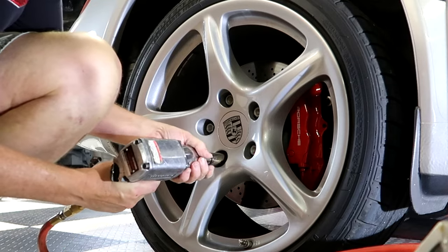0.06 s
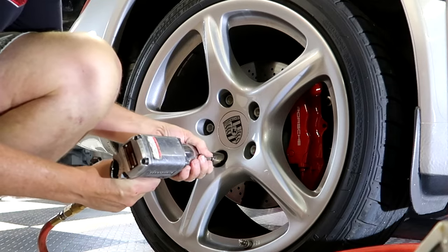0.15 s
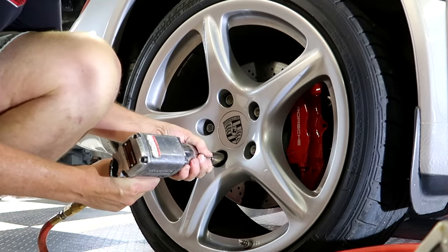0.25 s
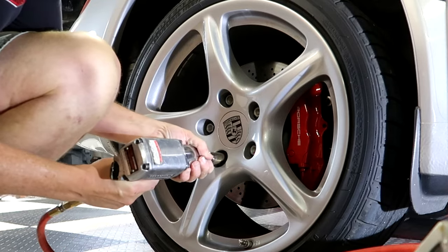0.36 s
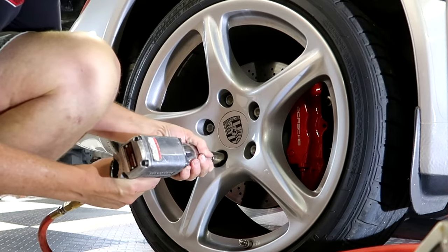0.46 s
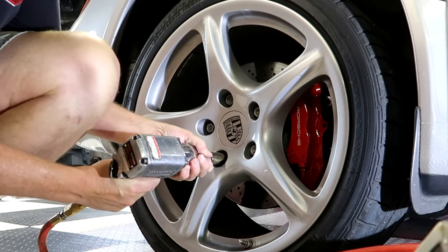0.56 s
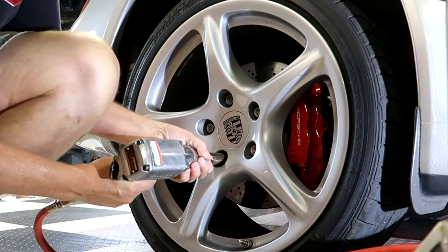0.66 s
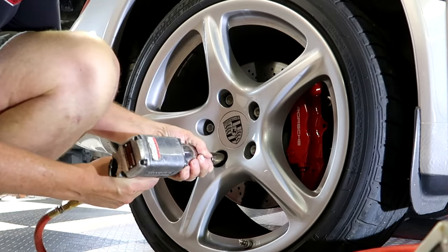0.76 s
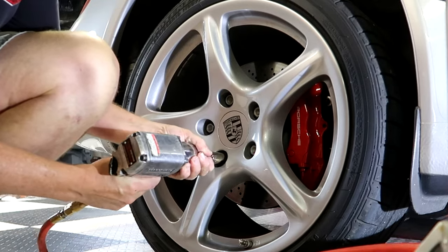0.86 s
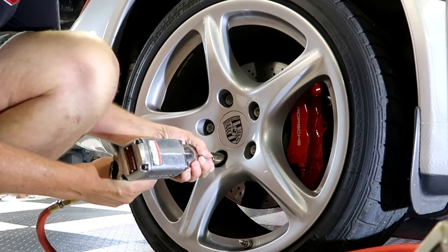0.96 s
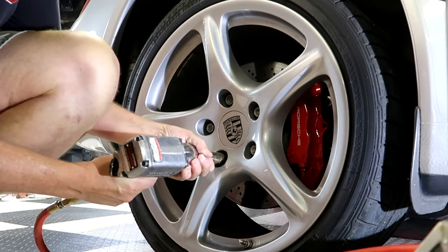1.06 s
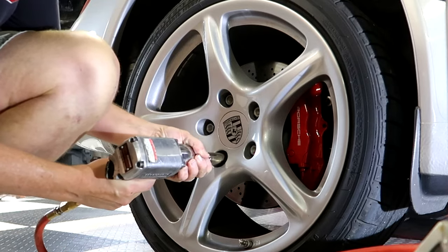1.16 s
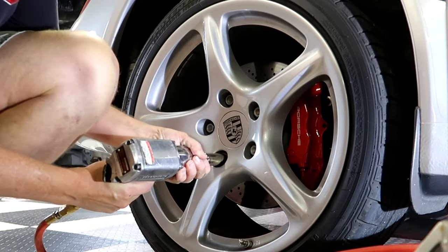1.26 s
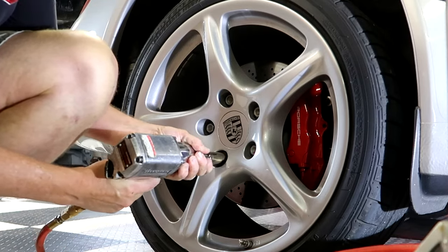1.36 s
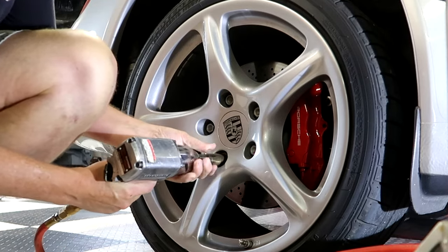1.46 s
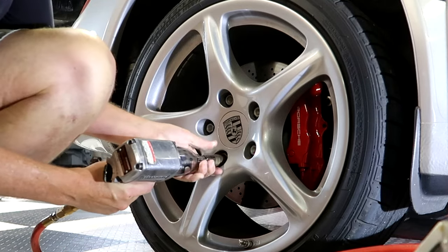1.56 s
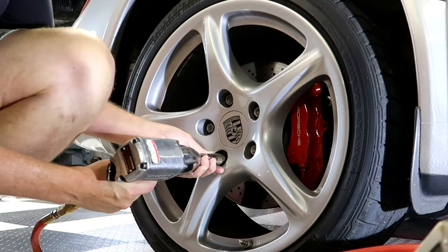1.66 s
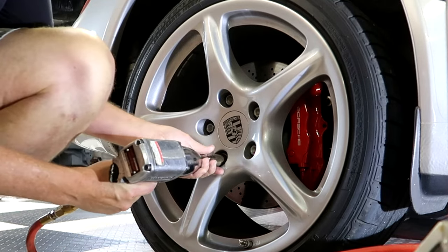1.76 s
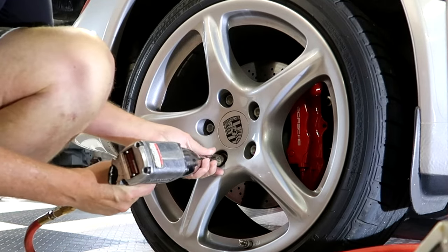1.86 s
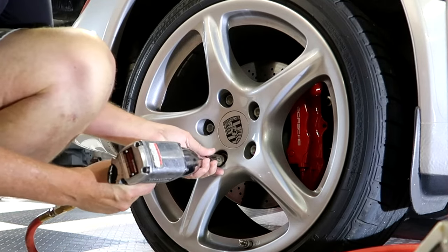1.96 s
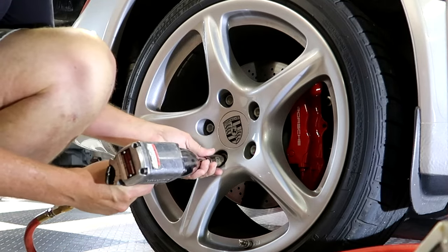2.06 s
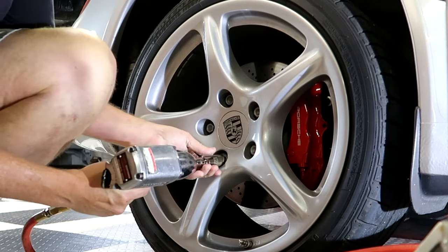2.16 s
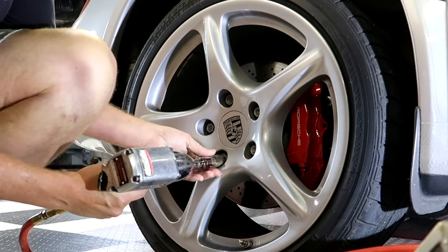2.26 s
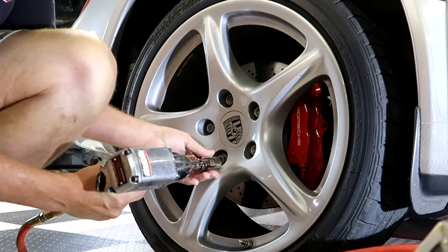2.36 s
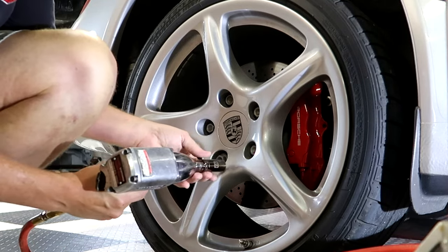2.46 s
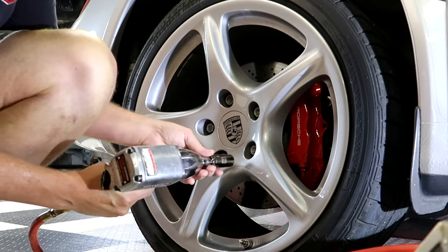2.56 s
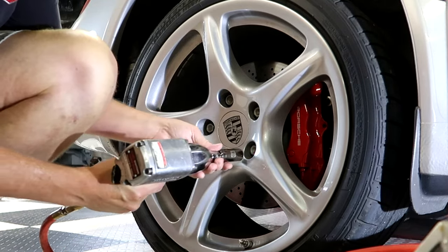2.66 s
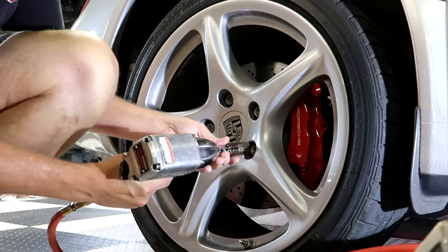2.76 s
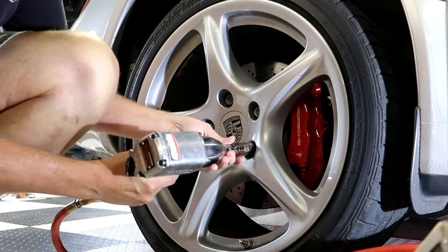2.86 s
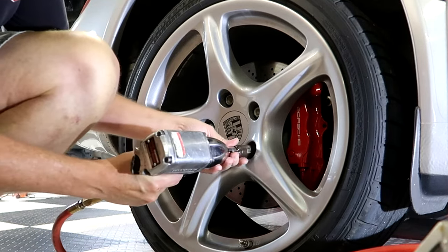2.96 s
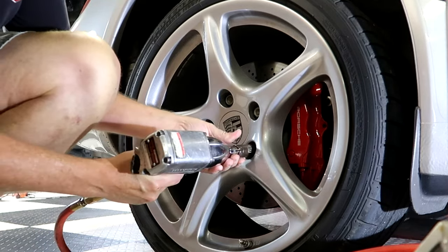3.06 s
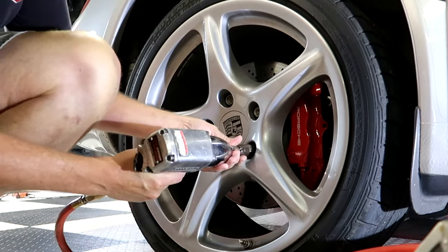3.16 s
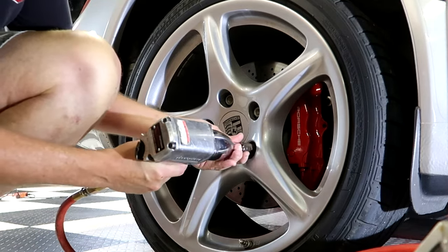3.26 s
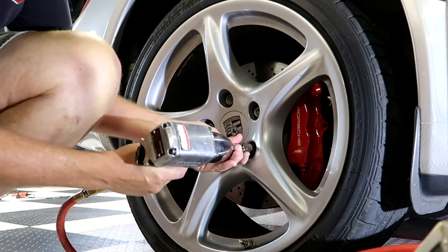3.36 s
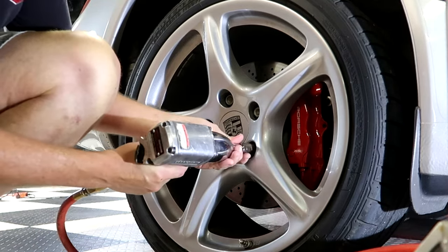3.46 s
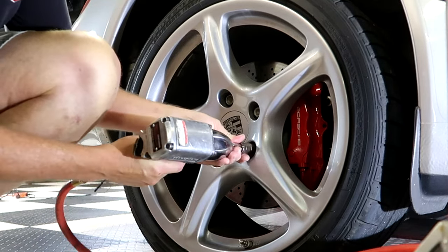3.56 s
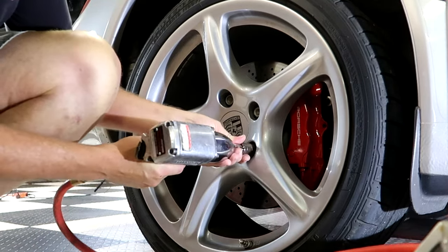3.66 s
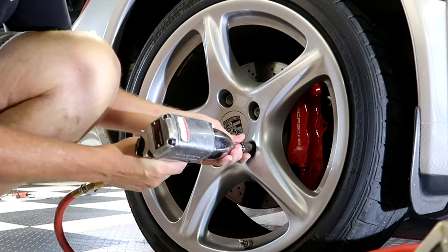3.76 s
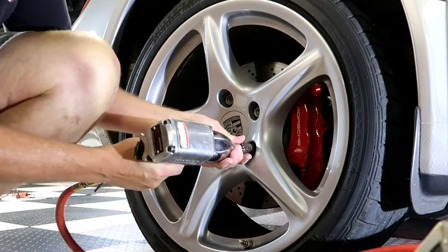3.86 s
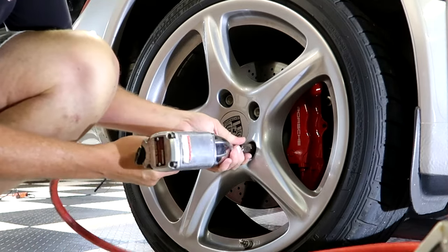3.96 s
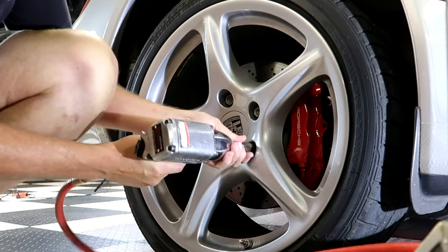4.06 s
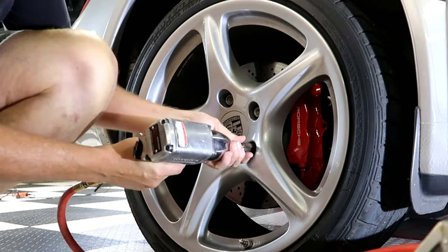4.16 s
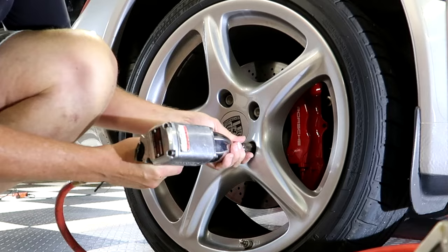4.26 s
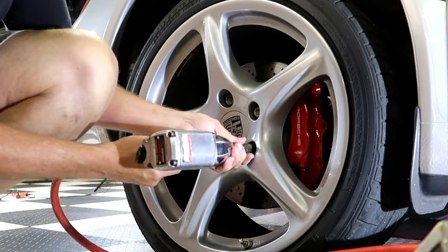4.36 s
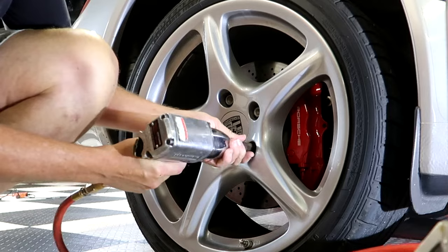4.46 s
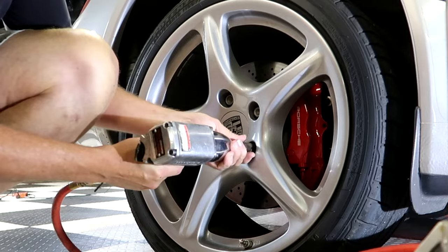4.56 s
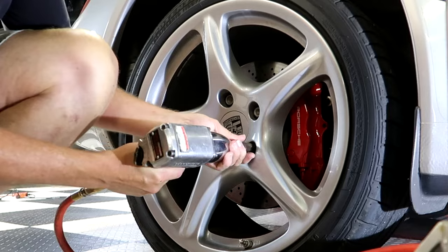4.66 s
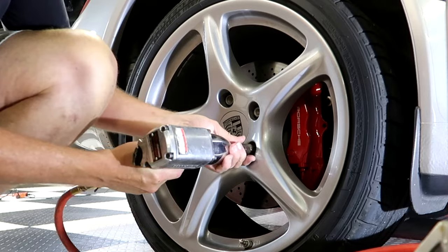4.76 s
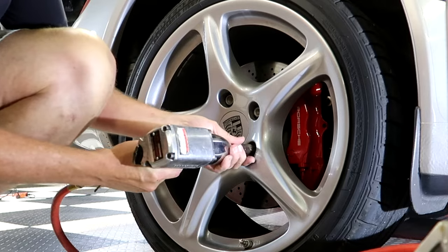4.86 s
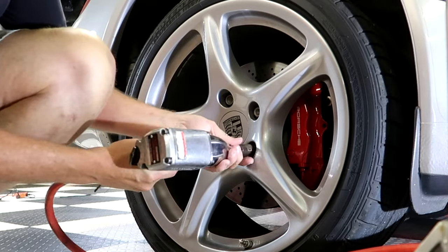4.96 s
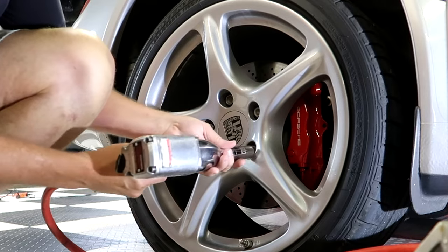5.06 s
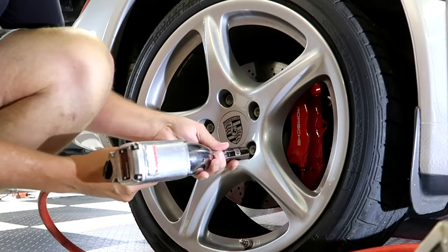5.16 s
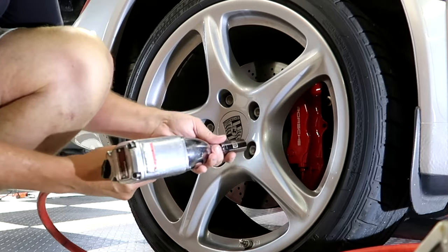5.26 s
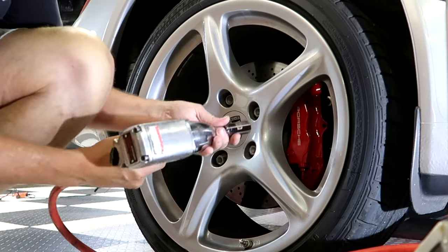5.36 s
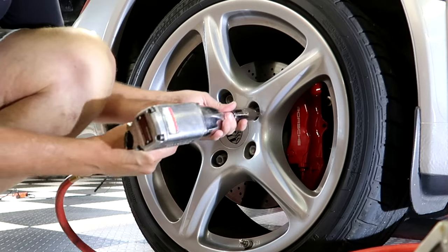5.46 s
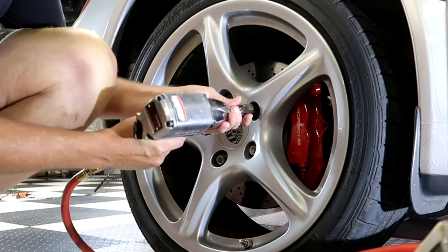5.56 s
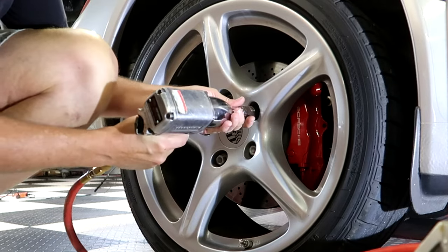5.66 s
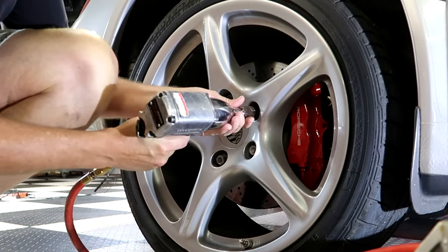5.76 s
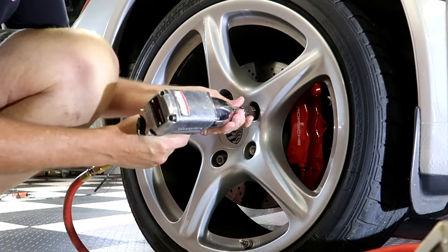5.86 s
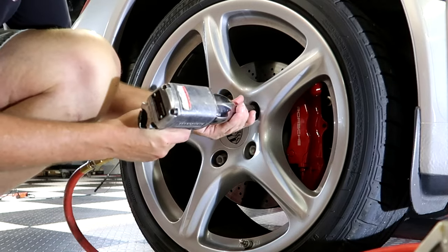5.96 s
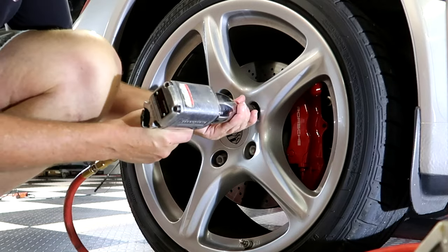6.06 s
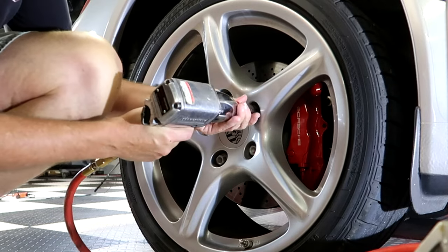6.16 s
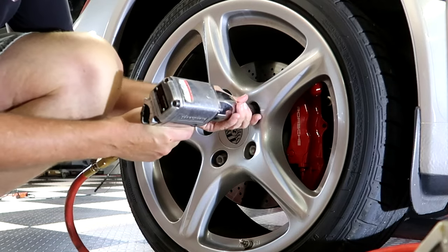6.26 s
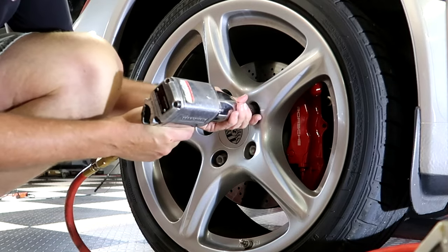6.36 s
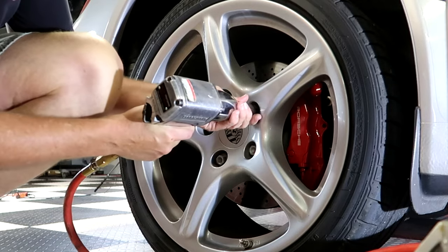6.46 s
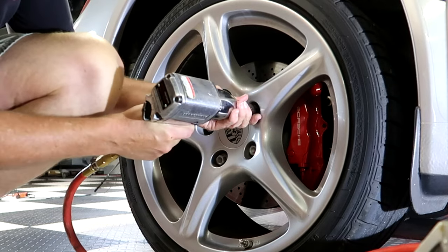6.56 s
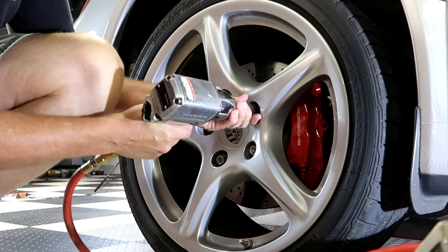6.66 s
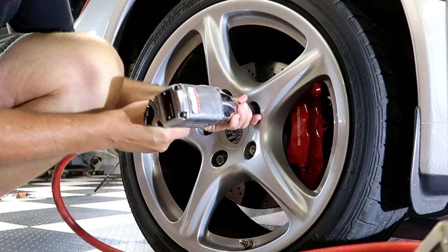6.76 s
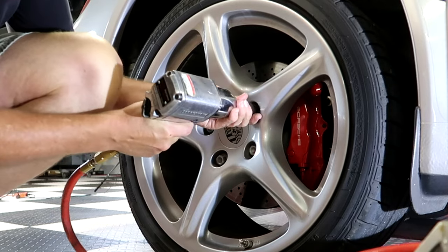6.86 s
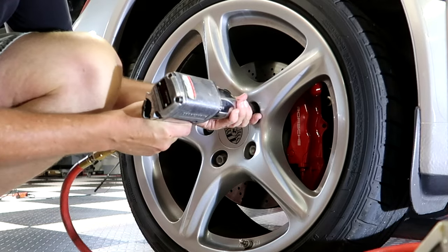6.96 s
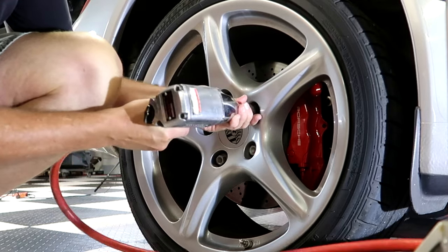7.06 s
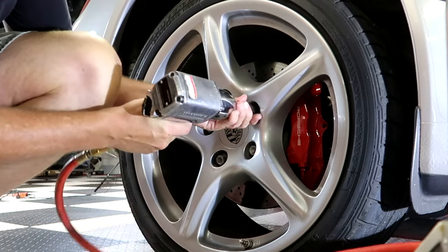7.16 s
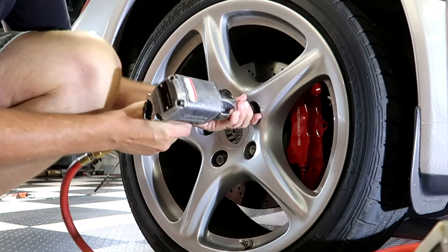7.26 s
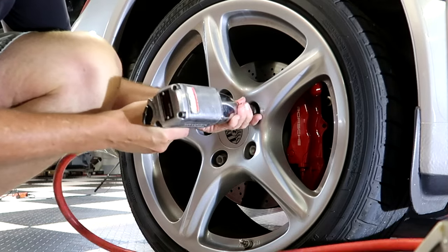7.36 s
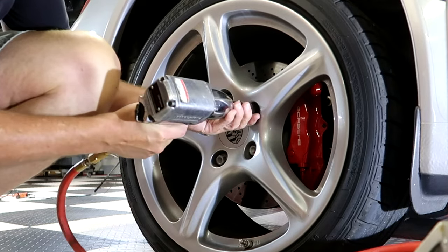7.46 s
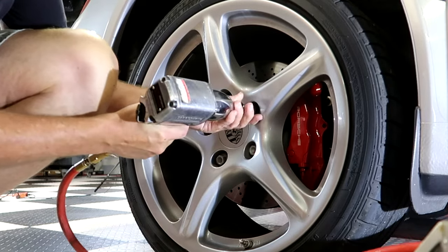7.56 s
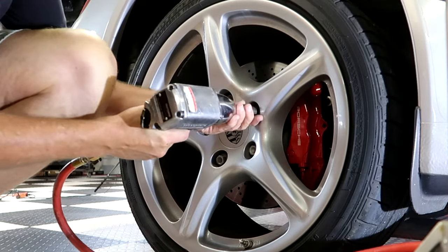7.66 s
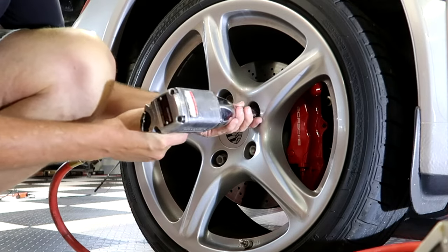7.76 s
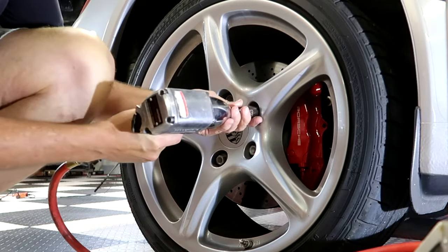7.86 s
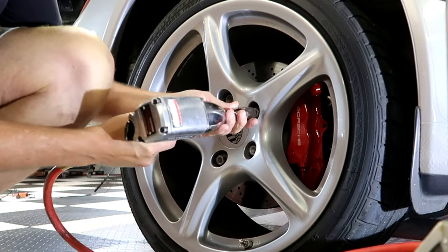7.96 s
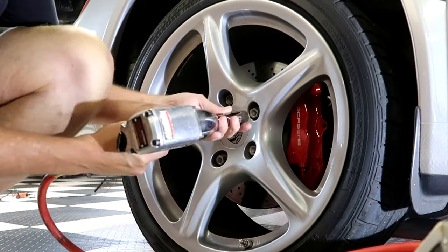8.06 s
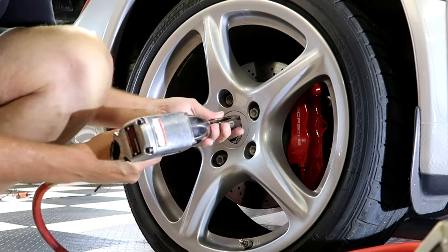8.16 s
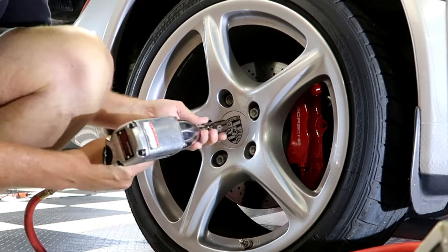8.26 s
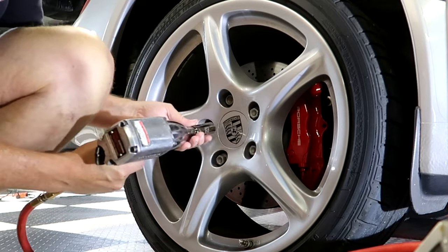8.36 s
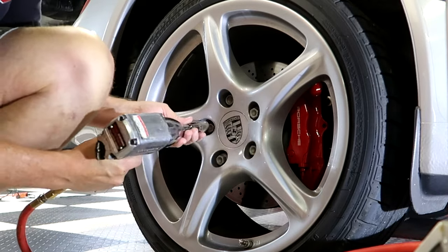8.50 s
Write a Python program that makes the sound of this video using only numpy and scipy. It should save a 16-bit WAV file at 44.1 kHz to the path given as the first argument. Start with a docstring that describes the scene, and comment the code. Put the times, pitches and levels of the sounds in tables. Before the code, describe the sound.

Close stereo pickup in a garage with a short, hard reverberation and a faint low machinery hum. At 0.25 s a soft air leak whirs, then an impact wrench bursts into loud, dense metallic hammering at 0.43-0.63 s, again at 0.8-0.95 and 1.1-1.4, with exhaust hiss and low thumps. The freed motor whines upward to about 1.45, then glides down by 2.0. Light socket clinks and dull wheel knocks dot 2.2-3.4. A knock and stronger valve hiss at 3.9 lead to bursts at 4.05-4.2 and 4.4-4.65, trailing into weak ticks until 4.9. Sparse clinks and knocks fill 5.2-6.5 as the hum creeps back. Valve air whirs at 6.7, then sharp bursts strike at 6.86, 7.15 and 7.45; an air pop hits at 7.57 as the motor briefly races, peaking near 7.6 and winding down by 8.0. A tiny clink and knock end it at 8.5.

```python
"""Impact wrench on wheel nuts

An air impact wrench loosens wheel nuts in a garage, close to two microphone ports.
On each trigger pull filtered noise hisses, low fading sines thump as exhaust, and noise bursts with ringing
modes strike as the hammer. A freed nut lets the vane motor race up and wind down as gliding tones.
Between nuts the socket clinks and knocks on the wheel over a low hum of noise and wavering tones.
"""
import sys
import numpy as np
from scipy import signal
from scipy.fft import rfft, irfft, next_fast_len
from scipy.io import wavfile
from scipy.ndimage import uniform_filter1d

SR = 44100
rng = np.random.default_rng(int(sys.argv[2]) if len(sys.argv) > 2 else 0)


def gain_from_db(level_db):
    """Convert decibel levels to linear amplitude factors (20 dB per decade)."""
    decades = np.asarray(level_db, float) / 20
    return 10 ** decades


def master(y):
    """Save y as 16-bit WAV."""
    cut = np.clip(np.atleast_2d(y).T, -1, 1)
    pcm = np.round(cut * 32767)  # scale
    wavfile.write(sys.argv[1], SR, pcm.astype(np.int16))


N = 376173
T = np.arange(N) / SR

# hammer on anvil, and the rattle as it runs down: (time [s], level [dB], clang pitch [Hz])
BLOWS = [(0.4431, -3.5, 1430), (0.4615, -5.5, 1845), (0.4815, -5, 1420), (0.5054, 0.5, 2160),
         (0.5298, -11.5, 1500), (0.5599, 1, 2110), (0.6317, -4, 2250), (0.74, -25.5, 1720),
         (0.8095, -6.5, 2260), (0.83, -9.5, 2240), (0.8465, -1, 2320), (0.8651, -13, 2820),
         (0.8882, -2.5, 3080), (0.9311, -3, 2820), (1.1225, -7.5, 2800), (1.1632, -2, 1960),
         (1.2027, -7.5, 2100), (1.2461, -12.5, 2880), (1.277, -7.5, 1360), (1.316, -5, 1430),
         (1.8423, -28, 1410), (4.0629, 5, 2090), (4.0837, -5.5, 2500), (4.1073, 0.5, 2250),
         (4.1519, -1, 2980), (4.1962, -5.5, 2870), (4.428, -23.5, 2700), (4.4417, -13.5, 2200),
         (4.4807, 0.5, 2140), (4.5265, -8, 2210), (4.567, -6.5, 2440), (4.598, -12, 2140),
         (4.6405, -21, 2170), (4.6948, -28.5, 1650), (4.781, -26.5, 1350), (4.8121, -30.5, 1420),
         (4.8414, -28, 1730), (4.8884, -32.5, 1640), (6.861, 2, 1980), (6.8679, 0, 2190),
         (6.894, -14, 1600), (6.9125, -1.5, 3080), (6.952, -1.5, 2640), (6.9935, -8.5, 3029),
         (7.1672, -12, 1530), (7.1863, -13, 1380), (7.2078, -2, 3120), (7.249, -5, 2150),
         (7.2902, -6, 2870), (7.354, -14.5, 1520), (7.468, -17.5, 2190), (7.489, -4, 2670),
         (7.5134, -5.5, 1620), (7.5417, -3, 2220), (7.5695, -3, 2210)]
# body of a blow: (frequency [Hz], level [dB])
BLOW_COLOUR = [(240, -25), (400, 2), (1020, -7.5), (2380, 0), (3130, -3), (3660, -5.5), (4340, -12),
               (4940, -9.5), (7310, -16.5), (8320, -23), (9000, -25), (11700, -58.5), (19800, -120)]
# treble shared by blows and exhaust air: (frequency [Hz], level [dB])
TREBLE_COLOUR = [(4410, -34.5), (7500, -7.5), (9880, -2), (10200, -7), (10600, -1.5), (11100, -1),
                 (13900, -5), (14500, -7)]
# what the socket rings with: (frequency [Hz], level [dB], free ring time T60 [s], group: 0 low, 1 middle, 2 top)
SOCKET_MODES = [(1180, -11.5, 0.17, 0), (1321, -8, 0.48, 0), (1630, -4, .12, 0), (2440, -3.5, 0.045, 0),
                (2640, -2.5, 0.07, 0), (3030, -10, 0.28, 0), (4330, -8, 0.48, 1), (4375, -6, 0.4, 1),
                (4420, -1.5, .08, 1), (4490, -6.5, .45, 1), (4700, -9, .35, 1), (10650, -3, 0.22, 2),
                (10700, -6, 0.17, 2), (11700, -12.5, 0.12, 2)]
# treble of a 0 dB blow, and its rise per dB of blow: softer blows are duller
BLOW_TREBLE_DB, BLOW_TREBLE_PER_DB = -22, 1.28

# runs of the free vane motor, one list each: (time [s], vane rate [Hz], level [dB])
SPINS = [
    [(1.22, 210.8, -36), (1.266, 247.8, -30.5), (1.3, 429.4, -32), (1.374, 606.6, -27.5),
     (1.446, 687.3, -23.5), (1.482, 671.7, -23), (1.54, 500.4, -20.5), (1.608, 338, -23),
     (1.674, 225.9, -31), (1.79, 140, -39), (1.976, 88.97, -61), (2.05, 83.97, -74.5)],
    [(7.46, 213.3, -39), (7.52, 406.3, -28), (7.558, 504.3, -29.5), (7.6, 564.5, -25), (7.622, 521, -32.5),
     (7.656, 393.2, -24), (7.712, 272.5, -34), (7.794, 174.2, -36.5), (7.968, 89.6, -69.5),
     (8.05, 81.5, -73.5)],
]
# first three vane tones: (level [dB], share that passes outside the muffler's resonances)
VANE_TONES = [(-3, 1.2), (-8, .9), (-10, .6)]
# muffler resonances: (frequency [Hz], width [Hz], lift [dB])
MUFFLER = [(230, 50, 0), (410, 70, 4), (570, 50, 1), (1090, 100, 6), (1400, 170, 13), (2050, 300, -3)]
VANE_BASS_HZ = 164  # the small outlet sends out little below this

# trigger pulls: (pressed [s], released [s], air level [dB], fall after release [dB/s])
PULLS = [(0.431, 0.628, -34.5, 83.5), (0.792, .95, -36.5, 71.5), (1.108, 1.483, -25.5, 71),
         (4.04, 4.15, -28, 119), (4.414, 4.648, -31, 122), (6.851, 6.952, -26.5, 112.5),
         (7.139, 7.288, -29, 118.5), (7.441, 7.636, -29, 91.5)]
# hiss of the exhaust air: (frequency [Hz], level [dB])
AIR_COLOUR = [(530, -50), (900, -11), (1360, -6.5), (1510, -3.5), (2000, -8.5), (2550, -11.5), (2750, -7.5),
              (3400, -15.5), (4810, -16.5), (6300, -19), (9000, -31), (11700, -64.5), (19800, -120)]
# low rush of the exhaust air: (frequency [Hz], level [dB])
RUSH_COLOUR = [(24, -50), (40, -26), (102, -7), (134, -18), (171, -3), (230, 3.5), (293, -6), (526, -11),
               (719, -22), (1040, -9), (1200, -18.5), (1560, -47.5), (2640, -120)]
AIR_RISE_S, RUSH_RISE_S = 0.044, 0.0058  # time constants
LINGER_DB, LINGER_DB_PER_S = -31, 41.5  # remnant of air after release, relative to the pull
AIR_TREBLE_DB, RUSH_DB = -21, 0.5  # relative to the air flow
RACING_TREBLE_DB = -23  # relative to the motor
RUSH_THINS_HZ = 358  # vane rate above which the low rush thins out

# the half-open valve whirs before the motor starts: (opens [s], half open [s], motor starts [s], level [dB])
VALVE = [(0.253, 0.308, 0.41, -48), (3.895, 3.94, 4.061, -24.5), (6.671, 6.761, 6.862, -29.5)]
# leak through the valve: (frequency [Hz], level per hertz [dB])
VALVE_COLOUR = [(500, -17), (800, -19), (1050, -1.5), (1250, -8), (1500, -0.5), (1750, -3.5), (2050, -8.5),
                (2450, -2.5), (2850, 1), (3150, -7), (3500, -28), (3900, -18), (4600, -26), (5700, -11),
                (6400, -19.5), (7500, -35), (10000, -60)]
# whistle of the valve: (frequency [Hz], level per hertz [dB])
WHISTLE = [(700, -40.5), (960, -14.5), (1050, 0.5), (1150, -18), (1400, -20), (1500, -6), (1600, -22.5),
           (2650, -25.5), (2830, -10.5), (3000, -27.5), (4000, -59.5)]
SWELL_DB, VALVE_TREBLE_DB = 35, -27.5  # rise of the leak; its treble relative to the rest
WHISTLE_DB, WHISTLE_PER_DB = -26, 0.5  # the whistle speaks first and grows less than the leak

# exhaust puffs that ring the housing, most just ahead of a blow: (time [s], level [dB], pitch [Hz])
PUFFS = [(.438, -3, 228.3), (.458, -3, 219), (.478, -6, 184), (.528, -14, 189), (.546, -7.5, 233.6),
         (.805, -14, 178), (.829, -8, 219), (.87, -18, 177), (.911, -12.5, 229), (1.115, -14.5, 216),
         (1.139, -15.5, 184), (1.184, -16, 246), (1.224, -12, 207), (3.991, -11, 225), (4.058, -4, 160.7),
         (4.079, -6.5, 221), (4.131, -15, 236), (4.175, -19, 214), (4.424, -30, 185), (4.463, -13, 185),
         (4.504, -16.5, 232), (4.55, -19, 200), (4.608, -19.5, 227), (4.658, -34, 221), (4.721, -33, 207),
         (4.807, -25.5, 206), (4.886, -28.5, 214), (6.818, -16.5, 234), (6.857, -4.5, 195),
         (6.892, -9.5, 238), (6.938, -16, 235), (6.969, -20.5, 222), (7.189, -17.5, 185), (7.229, -20, 236),
         (7.273, -17, 236), (7.463, -16, 233)]
PUFF_T60_S, THUMP_DB = .095, -10  # ring time; low push of air relative to its puff
# one jet of exhaust hits the microphone: (time [s], level [dB])
POP = (7.57, -1.6)

# socket against nut and wheel, ring levels relative to the clink:
# (time [s], level [dB], clang pitch [Hz], middle rings [dB], top rings [dB])
CLINKS = [(2.2489, -57, 1777, -17.5, -29.5), (2.3476, -53.5, 1361, -35, -40),
          (2.8986, -26.5, 1603, -30.5, -47), (3.1084, -22.5, 2940, -13.5, -9.5),
          (3.1239, -18, 2530, -27, -42), (3.3422, -40, 1420, -21.5, -31), (3.4168, -26, 1247, -16, -49),
          (5.191, -43.5, 1980, -32.5, -28), (5.7753, -27.5, 1164, -15.5, -34.5),
          (5.8017, -25, 2744, -23, -26), (6.0647, -54.5, 1775, -13.5, -32.5), (6.112, -26.5, 1920, -7, -44),
          (6.1409, -36.5, 2250, -20.5, -37), (6.25, -42.5, 1170, -15, -41),
          (6.3573, -47.5, 1255, -23, -43.5), (6.4623, -39, 1578, -31.5, -51.5),
          (8.505, -54, 1546, -33, -42)]
# body of a clink: (frequency [Hz], level [dB])
CLINK_COLOUR = [(290, -23), (500, -7.5), (655, -19), (1070, 1), (1210, -3.5), (2290, -2), (2500, -4.5),
                (4000, -11), (5200, -23), (8800, -120)]
# treble of clinks and of the valve's leak: (frequency [Hz], level per hertz [dB])
CLINK_TREBLE = [(3200, -29), (4800, 6), (7000, -0.5), (10000, -7.5), (12000, -10), (14000, -37.5)]
# treble of a 0 dB clink, and its rise per dB of clink: softer clinks are duller
CLINK_TREBLE_DB, CLINK_TREBLE_PER_DB = -11.52, 1.48
# duller knocks of the tool on the wheel: (time [s], level [dB], pitch [Hz])
KNOCKS = [(2.743, -41.5, 425), (2.901, -35.5, 525), (3.124, -27.5, 527), (3.418, -26.5, 518),
          (3.938, -6, 398), (4.297, -24, 406), (4.653, -25.5, 554), (4.773, -38, 388), (4.802, -37, 353),
          (4.844, -28, 367), (4.888, -42.5, 371.6), (5.541, -50, 398), (5.826, -21, 534), (6.115, -35, 392),
          (6.251, -20, 543), (6.359, -38.5, 398), (6.463, -35, 377), (7.073, -28.5, 546),
          (7.409, -30.5, 546.3), (8.504, -37, 566)]
# harder shakes of the loose socket on the spinning anvil: (time [s], level [dB])
SHAKES = [(1.277, -27.5), (1.315, -23.5), (1.725, -33), (7.797, -49), (7.879, -47.5)]
JINGLE_DB, SHAKE_T60_S = -25.5, 0.11  # jingle relative to the motor; ring time of a shake

# noise of the distant machinery: (frequency [Hz], level [dB])
HUM_COLOUR = [(15, -33.5), (25, -15.5), (87, 2), (132, -3.5), (190, -10), (260, -2), (303, -17), (364, -22),
              (597, -25), (859, -31.5), (1240, -31.5), (3070, -41), (11600, -59), (12500, -65),
              (16200, -95.5), (22000, -120)]
# tones of the distant machinery: (frequency [Hz], level [dB], waver [dB])
HUM_TONES = [(60, -2.5, 2.5), (95.4, -6.5, 4.5), (256.3, -7.5, 2.5), (1350, -28, 3)]
# the hum sinks under loud sounds and creeps back
HUM_DB, DUCK_FROM_DB, DUCK_PER_DB = -35.5, -42.5, 1.3
SINK_S, WAIT_S, CREEP_DB_PER_S = 0.13, 0.16, 17.5

# how far the two ports differ: (frequency [Hz], side minus mid [dB])
PORTS = [(60, -34), (110, -36), (200, -34), (380, -28), (700, -23), (1290, -26), (2380, -18), (4400, -6.5),
         (8120, -0.5), (15000, 0)]
ROOM_T60_S, ROOM_DB = .42, -9


def unit(x):
    """Scale to rms 1."""
    return x / np.sqrt(np.mean(x ** 2))


def shape(x, points):
    """Filter by (frequency [Hz], level [dB]) points joined on a log frequency axis."""
    hz, db = np.transpose(points)
    size = next_fast_len(len(x))
    log_hz = np.log(np.arange(size // 2 + 1) * SR / size + 1)
    return irfft(rfft(x, size) * gain_from_db(np.interp(log_hz, np.log(hz), db)), size)[:len(x)]


def noise(points):
    """Steady noise of a given colour, rms 1."""
    return unit(shape(rng.standard_normal(N), points))


def gain(tables, column):
    """Gain along a dB column of several curves, silent between them."""
    out = np.zeros(N)
    for rows in tables:
        rows = np.array(rows)
        out += gain_from_db(np.interp(T, rows[:, 0], rows[:, column], -200, -200))
    return uniform_filter1d(out, size=200)


def walk(rate):
    """Random levels held 1 / rate s and slewed; spread near 1."""
    hold = int(SR / rate)
    return uniform_filter1d(np.repeat(rng.standard_normal(N // hold + 1), hold), hold)[:N]


def add(out, s, sound):
    """Mix a sound in at a time."""
    i = int(s * SR)
    out[i:i + len(sound)] += sound[:N - i]


def fade(t60, rise, length):
    """Quick rise, exponential fall."""
    t = T[:int(length * SR)]
    return (1 - np.exp(-t / rise)) * np.exp(-np.log(1000) * t / t60)


def ring(hz, t60, length, wobble=np.zeros(N)):
    """One fading mode; loose contact wobbles its phase and so widens it."""
    envelope = fade(t60, 0.0003, length)
    size = len(envelope)
    return envelope * np.sin(2 * np.pi * hz * T[:size] + wobble[:size])


def strikes(hits, colour, treble, crack, tail, tail_db, scrape_db):
    """Each strike: a scrape that swells into contact, a short crack and a longer rattle, with its own treble."""
    body, top = np.zeros(N), np.zeros(N)
    scrape = gain_from_db(scrape_db) * fade(0.036, 0.00059, .03)[::-1]
    after = fade(crack, 0.000077, .3) + gain_from_db(tail_db) * fade(tail, 0.005, .3)
    envelope = np.concatenate([scrape, after])
    for s, db, high_db in hits:
        start = s - len(scrape) / SR
        add(body, start, gain_from_db(db - 7.5) * envelope)
        add(top, start, gain_from_db(high_db) * envelope)
    return body * noise(colour) + top * noise(treble)


def hammer():
    """Blows: crack and rattle, a brief clang of its own pitch, and the socket's modes damped by the nut."""
    hits = [(s, db, BLOW_TREBLE_DB + BLOW_TREBLE_PER_DB * db) for s, db, _ in BLOWS]
    treble = TREBLE_COLOUR + [(15700, -24.5)]
    out = strikes(hits, BLOW_COLOUR, treble, crack=0.015, tail=0.14, tail_db=-11.5, scrape_db=-10.5)
    wobble = 0.93 * walk(300)
    for (s, db, clang_hz), (_, _, high_db) in zip(BLOWS, hits):
        add(out, s, gain_from_db(db - 7) * ring(clang_hz, 0.029, .06))
        for hz, mode_db, t60, group in SOCKET_MODES:
            chance = rng.standard_normal()  # shifts level and pitch together
            level_db = (db - 15.5, db - 22.5, high_db - 15)[group] + mode_db + 1.2 * chance
            loose = wobble[int(s * SR + hz):]  # each mode reads its own stretch
            # the nut cuts the ring time to a fifth
            add(out, s, gain_from_db(level_db) * ring(hz * (1 + 0.0029 * chance), 0.2 * t60, .2, loose))
    return out


def motor():
    """Vane tones glide with the speed and flare where they cross the muffler's resonances; also the vane phase."""
    s, hz = np.vstack(SPINS)[:, :2].T
    vane_hz = uniform_filter1d(np.interp(T, s, hz), size=400) * (1 + .014 * walk(70))
    phase = 2 * np.pi * np.cumsum(vane_hz) / SR

    def lift(tone_hz):
        """Gain of the muffler's resonances at the gliding pitch of a tone."""
        return sum(gain_from_db(db) / (1 + ((tone_hz - f) / width) ** 2) ** 2 for f, width, db in MUFFLER)

    low, upper = np.zeros(N), np.zeros(N)
    for k, (db, share) in enumerate(VANE_TONES, 1):
        bass_cut = 1 + (VANE_BASS_HZ / (k * vane_hz)) ** 4
        low += gain_from_db(db) * (share + lift(k * vane_hz)) / bass_cut * np.sin(k * phase)
    for k in range(4, 17):
        level = (0.2 + lift(k * vane_hz)) * gain_from_db(-1.1 * k + 1.8 * walk(90))
        upper += level * np.sin(k * phase + k * k) * (k * vane_hz < 4000)
    # air blows through the same resonance and lingers there
    breath = noise([(800, -41), (1200, -9.5), (1390, -3.5), (1600, -9.5), (2400, -44), (5000, -90.5)])
    upper += gain_from_db(-5) * breath
    tone = low * gain_from_db(3.6 * walk(60)) + gain_from_db(-2) * upper
    return gain(SPINS, column=2) * tone, phase


def flow(rise):
    """Air flow: rises on each pull, holds, falls on release with a slower remnant."""
    out = np.zeros(N)
    for pressed, released, db, fall in PULLS:
        after = np.maximum(T - released, 0)
        swell = 1 - np.exp(-np.maximum(T - pressed, 0) / rise)
        out += swell * gain_from_db(db) * (gain_from_db(-fall * after) + gain_from_db(LINGER_DB - LINGER_DB_PER_S * after))
    return out


def air(phase):
    """Exhaust air, chopped by the vanes and flickering, brighter while the motor races, over a low rush."""
    chop = 1 + .5 * np.cos(phase)
    hiss = flow(AIR_RISE_S) * noise(AIR_COLOUR) * gain_from_db(2 * walk(70) + 2 * walk(500))
    quick_flow = flow(RUSH_RISE_S)
    bright = gain_from_db(AIR_TREBLE_DB) * quick_flow + gain_from_db(RACING_TREBLE_DB) * gain(SPINS, column=2)
    flicker = gain_from_db(3.3 * walk(54) + 3.3 * walk(600))
    treble = bright * noise(TREBLE_COLOUR + [(15700, -22.5)]) * flicker
    vane_hz = np.gradient(phase) * SR / (2 * np.pi)
    thinning = 1 + (vane_hz / RUSH_THINS_HZ) ** 2
    rush = gain_from_db(RUSH_DB) / thinning * quick_flow * noise(RUSH_COLOUR)
    return chop * (hiss + treble) + rush


def valve():
    """Air leaking past the half-open valve swells, then holds until the motor takes the air; it whistles in the gap."""
    curves = [[(opens, db - SWELL_DB), (half, db), (starts, db), (starts + .03, db - 11.5)]
              for opens, half, starts, db in VALVE]
    opening = gain(curves, column=1)
    leak = noise(VALVE_COLOUR) + gain_from_db(VALVE_TREBLE_DB) * noise(CLINK_TREBLE)
    is_open = opening > 1e-6
    whistle = gain_from_db(WHISTLE_DB) * opening ** WHISTLE_PER_DB * is_open * noise(WHISTLE)
    return opening * leak * gain_from_db(2 * walk(30) + 3.0 * walk(250)) + whistle


def puffs():
    """Exhaust puffs ring the housing in two fading partials over a low push of air."""
    out = np.zeros(N)
    t = T[:int(.25 * SR)]
    push = fade(0.084, 0.00038, .25) * np.cos(2 * np.pi * 85 * t)
    for s, db, hz in PUFFS:
        wave = np.sin(2 * np.pi * hz * t) + 0.42 * np.sin(2 * np.pi * 1.6 * hz * t)
        add(out, s, -gain_from_db(db) * fade(PUFF_T60_S, 0.0015, .25) * wave)
        add(out, s + 0.0054, -gain_from_db(db + THUMP_DB) * push)
    return out


def pop():
    """The jet on the microphone: a sharp suck, then a slow push back."""
    out = np.zeros(N)
    s, db = POP
    suck = 3.3 * fade(0.0034, 0.00023, .1)
    push = 0.5 * fade(0.022, 0.0027, .1)
    add(out, s, gain_from_db(db) * (push - suck))
    return out


def clinks():
    """Clinks: a crack and a clang, then the steel socket rings, each mode struck differently every time."""
    hits = [(s, db, CLINK_TREBLE_DB + CLINK_TREBLE_PER_DB * db) for s, db, *_ in CLINKS]
    out = strikes(hits, CLINK_COLOUR, CLINK_TREBLE, crack=0.034, tail=0.17, tail_db=-3.5, scrape_db=-39)
    wobble = np.tile(1.6 * walk(260), 2)
    for s, db, clang_hz, middle_db, top_db in CLINKS:
        add(out, s, gain_from_db(db - 3.0) * ring(clang_hz, 0.051, .12))
        for hz, mode_db, t60, group in SOCKET_MODES:
            level_chance, pitch_chance = rng.standard_normal(2)
            group_db = (-19.5, middle_db - 6.5, top_db - 3.5)[group]
            level_db = db + group_db + mode_db + 2 * level_chance
            loose = wobble[int(s * SR + hz):]
            add(out, s, gain_from_db(level_db) * ring(hz * (1 + 0.0059 * pitch_chance), t60, .5, loose))
    return out


def knocks():
    """The tool knocks on the wheel: three low modes fade together."""
    out = np.zeros(N)
    t = T[:int(.25 * SR)]
    for s, db, hz in KNOCKS:
        wave = np.sin(2 * np.pi * hz * t)
        wave += 0.45 * np.sin(2 * np.pi * .72 * hz * t)
        wave += 0.36 * np.sin(2 * np.pi * 1.4 * hz * t)
        add(out, s, gain_from_db(db + 2.5) * fade(0.05, 0.00056, .25) * wave)
    return out


def jingle():
    """The loose socket jingles on the spinning anvil: noise peaked at its top modes follows the motor."""
    top_modes = [(hz, db) for hz, db, _, group in SOCKET_MODES if group == 2]
    colour = [(5000, -82), (9000, -36.5)] + top_modes + [(12500, -46.0), (15000, -85.5)]
    shake = gain_from_db(JINGLE_DB) * gain(SPINS, column=2) * gain_from_db(2.5 * walk(60))
    for s, db in SHAKES:
        add(shake, s, gain_from_db(db) * fade(SHAKE_T60_S, .002, .3))
    return shake * noise(colour)


def hum():
    """Distant machinery: low noise with a few tones that waver in level and pitch."""
    out = noise(HUM_COLOUR)
    for hz, db, waver_db in HUM_TONES:
        phase = 2 * np.pi * np.cumsum(hz + 3 * walk(10)) / SR
        out += gain_from_db(db + waver_db * walk(24)) * np.sin(phase)
    return gain_from_db(HUM_DB) * out


def duck(near):
    """Gain that sinks while the near sound is loud, waits, then creeps back; worked out 100 times a second."""
    step, dt = 441, .01
    loud_db = 10 * np.log10(uniform_filter1d(near ** 2, size=1764)[::step] + 1e-12)
    out, db, wait = [], 0., 0.
    for goal in -DUCK_PER_DB * np.maximum(loud_db - DUCK_FROM_DB, 0):
        if goal < db:
            db += (goal - db) * min(dt / SINK_S, 1)
            wait = WAIT_S
        else:
            wait -= dt
            db = min(db + CREEP_DB_PER_S * np.clip(-wait, 0, dt), goal)
        out.append(db)
    return gain_from_db(np.interp(T, T[::step], out))


def reverberate(x, tail):
    """Convolve with a fading noise tail of unit energy."""
    return signal.fftconvolve(x, tail / np.sqrt(np.sum(tail ** 2)))[:N]


def scene():
    """All sources, the garage's tail, and the difference between the two ports."""
    tone, phase = motor()
    near = hammer() + tone + air(phase) + valve() + puffs() + pop() + clinks() + knocks() + jingle()
    garage = shape(rng.standard_normal(int(.7 * SR)), [(150, -1.5), (1500, -8.0), (5000, 0), (12000, -3.5)])
    room = near + gain_from_db(ROOM_DB) * reverberate(near, fade(ROOM_T60_S, .01, .7) * garage)
    # nearby reflections reach the two ports differently, mostly in the treble
    scatter = fade(0.15, .0002, .1) * rng.standard_normal(int(.1 * SR))
    # the hum comes from all round, so mid and side draw it separately
    hum_gain = duck(near)
    mid = room + hum_gain * hum()
    side = shape(reverberate(room, scatter) + hum_gain * hum(), PORTS)
    return np.array([mid + side, mid - side])


def low_pass(x):
    """Removes everything above the highest recorded frequency."""
    return signal.sosfilt(signal.butter(12, 15700, fs=SR, output="sos"), x)


def record(dry):
    """The loudest peaks clip at full scale."""
    mix = np.clip(dry, -1, 1)
    return low_pass(mix)


dry = scene()
out = record(dry)
master(out)
```